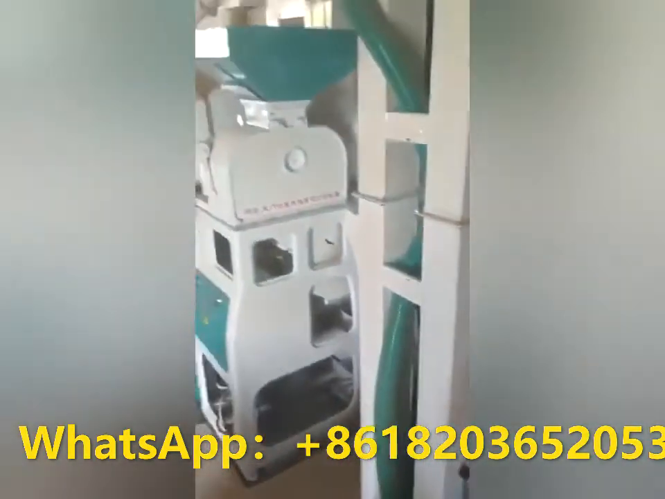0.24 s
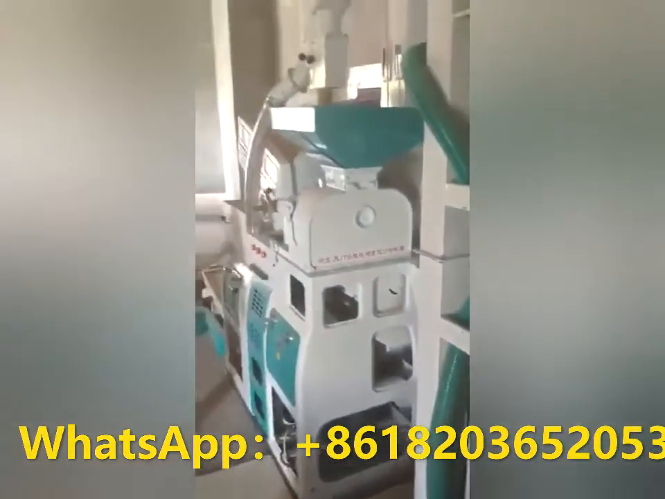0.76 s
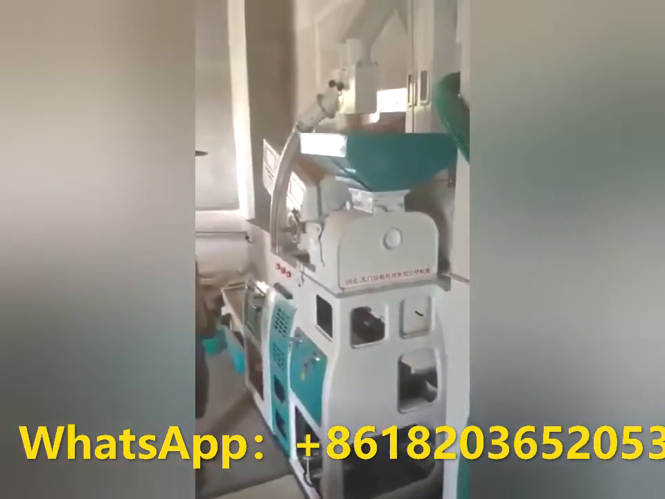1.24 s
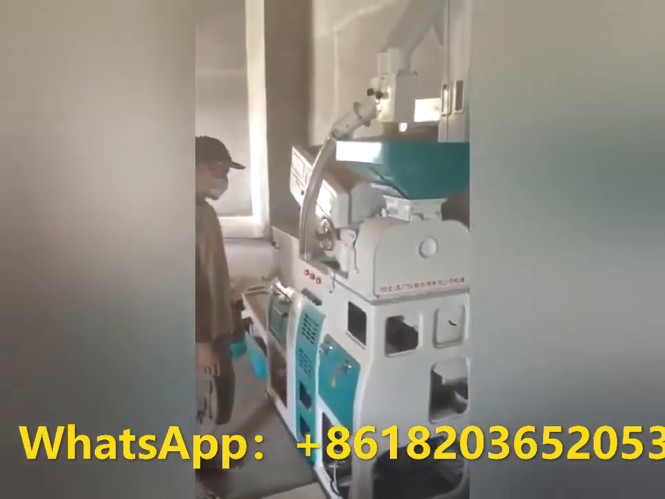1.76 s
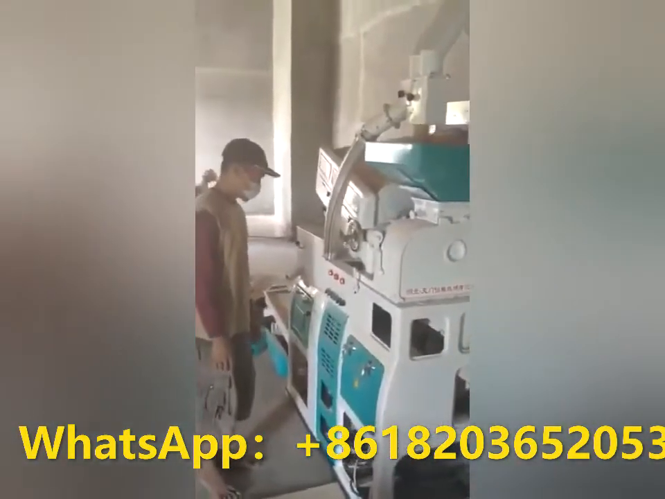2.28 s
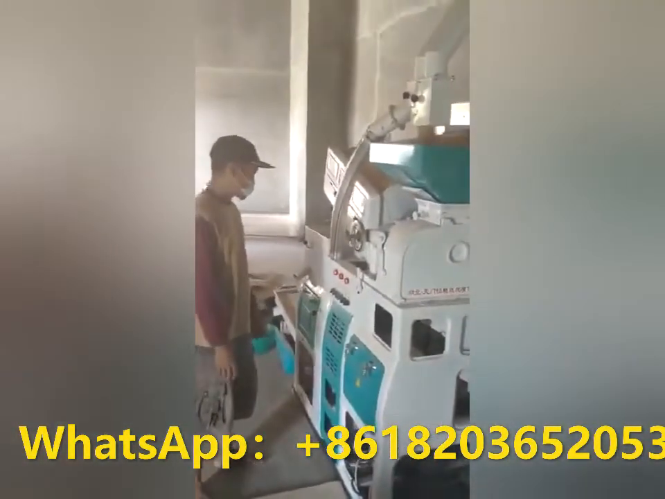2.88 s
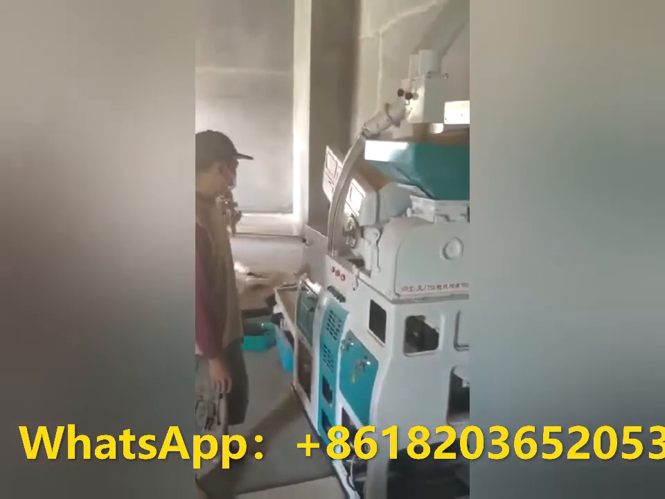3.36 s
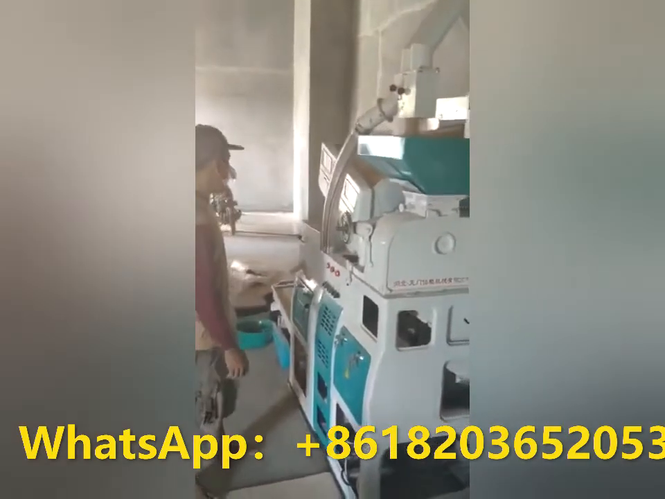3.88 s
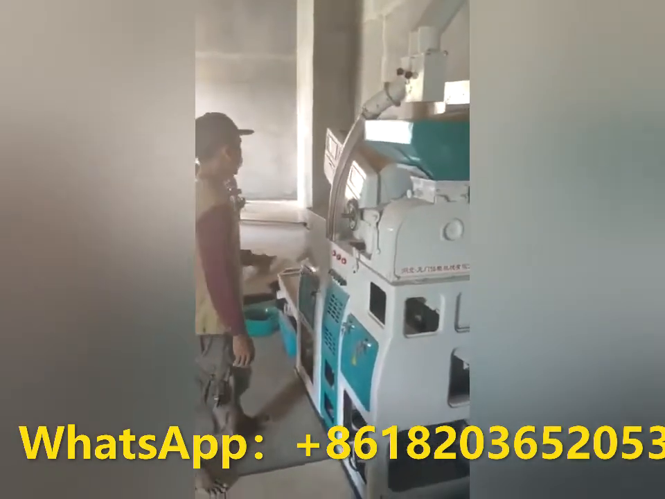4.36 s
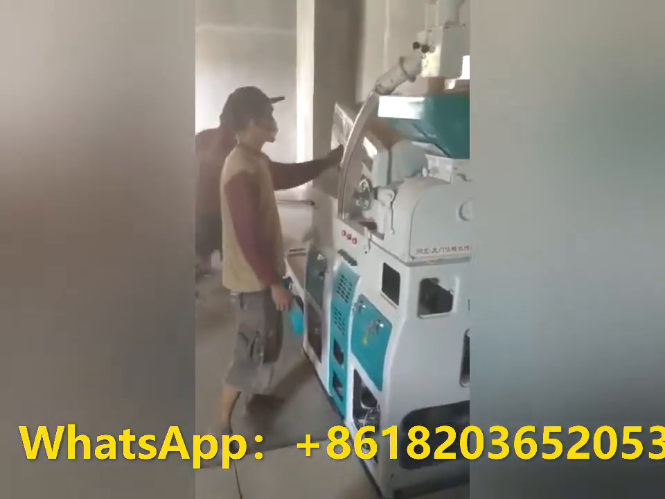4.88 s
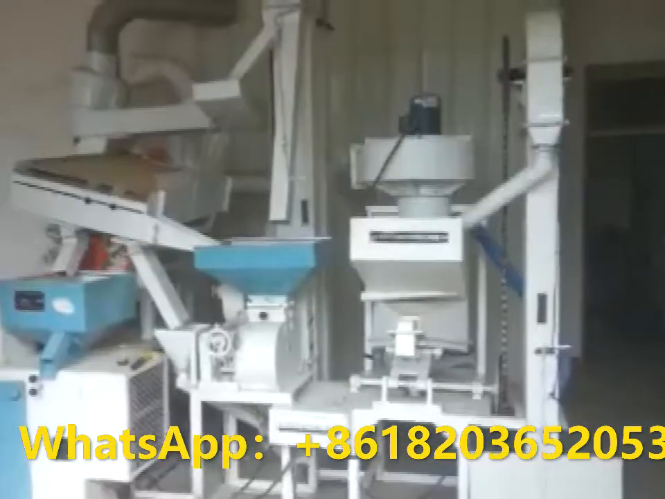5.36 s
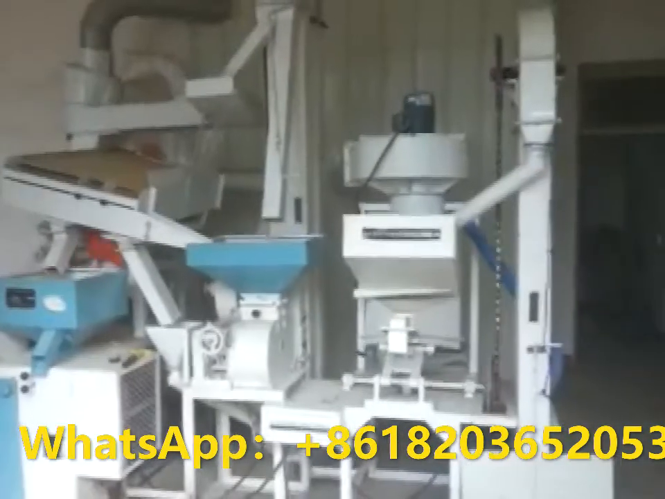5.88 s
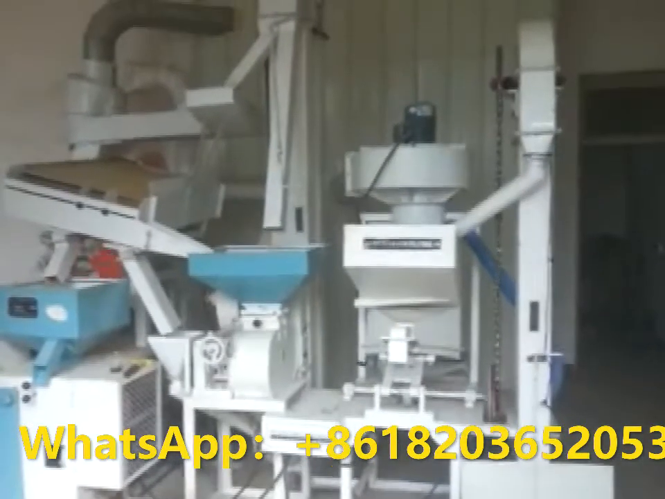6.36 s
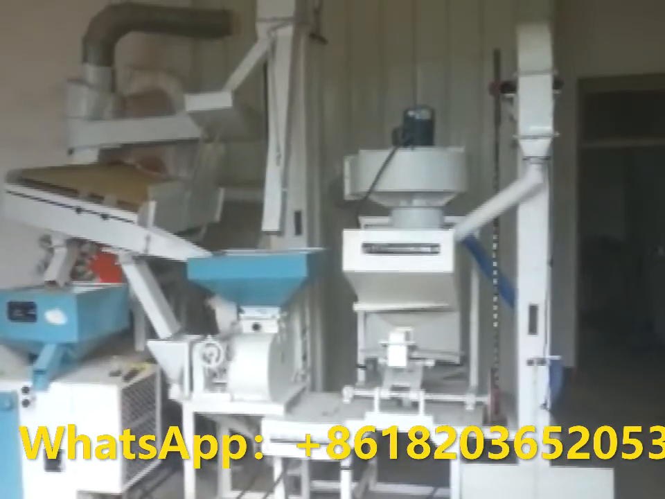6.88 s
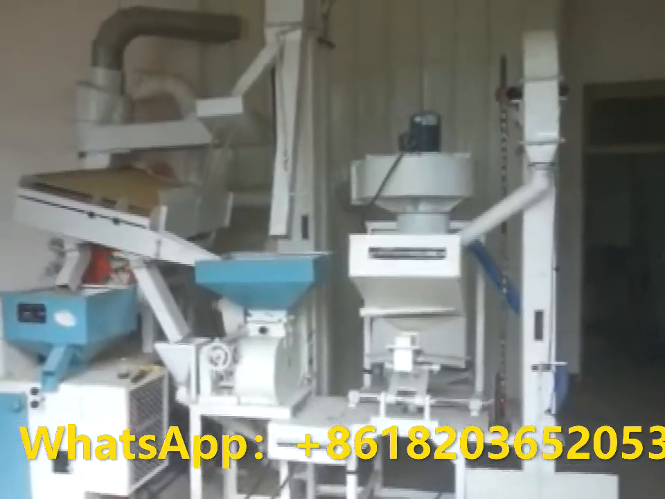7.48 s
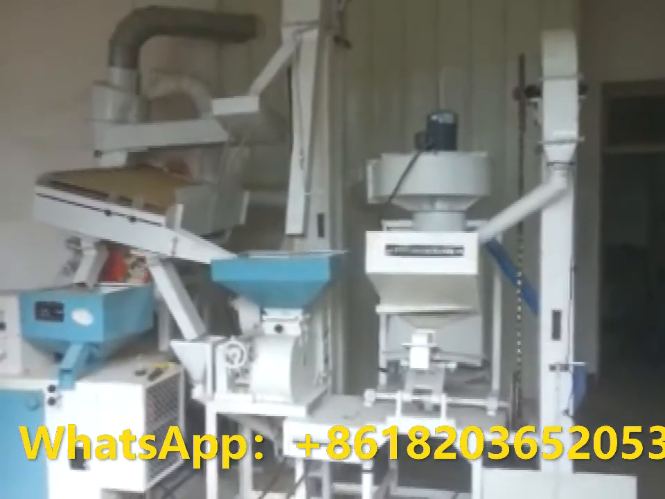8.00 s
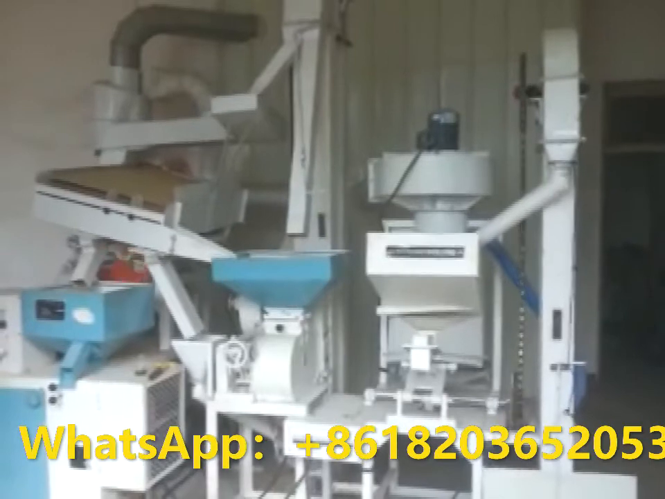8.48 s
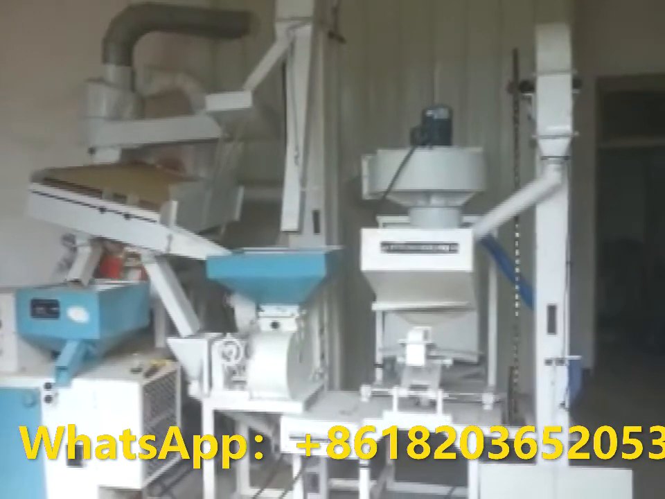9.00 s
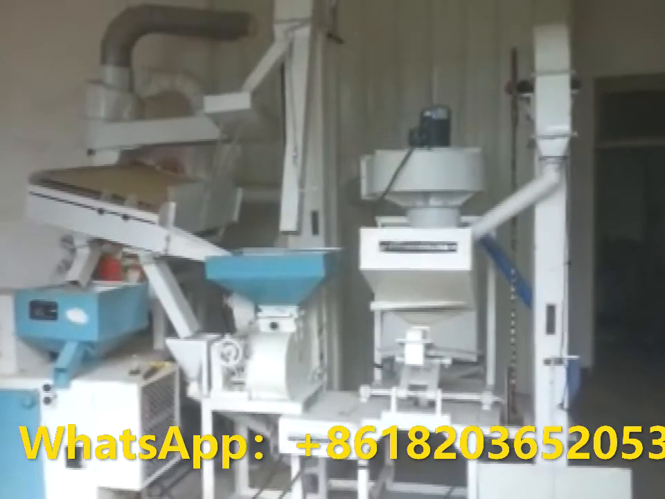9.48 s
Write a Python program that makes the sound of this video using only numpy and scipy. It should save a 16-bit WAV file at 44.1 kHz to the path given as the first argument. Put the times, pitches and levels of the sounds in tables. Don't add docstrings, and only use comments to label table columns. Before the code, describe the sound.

Steady close machine roar with gritty grain hiss and faint belt squeaks, a short silent gap, then duller phone-quality plant noise pulsing and whining.

```python
import sys
import numpy as np
from scipy import signal
from scipy.io import wavfile
from scipy.ndimage import uniform_filter1d

SR = 44100
rng = np.random.default_rng(int(sys.argv[2]) if len(sys.argv) > 2 else 0)


def persist_wave(psi):
    counts = np.round(np.clip(psi, -1, 1) * 32767).astype(np.int16)
    wavfile.write(sys.argv[1], SR, np.atleast_2d(counts).T)


def how_loud(loudness_db):
    steps = np.asarray(loudness_db, float) / 20
    return 10 ** steps


N = 429527
T = np.arange(N) / SR
HZ = np.fft.rfftfreq(1024, 1 / SR)
FRAME_S = np.arange(N // 256 + 5) * 256 / SR
STOP_S, START_S = 5.014, 5.1657


def evened(x):
    return x / np.sqrt(np.mean(x ** 2) + 1e-20)


def read(points, hz):
    f, value = np.transpose(points)
    return np.interp(np.log(hz + 1), np.log(f + 1), value)


def drift(t, top_hz):
    rates = np.geomspace(top_hz / 20, top_hz, num=16)
    return evened(sum(np.sin(2 * np.pi * (f * t + rng.random())) / f ** 0.26 for f in rates))


def swells(feed, follows, lurch_db):
    s, level = np.transpose(feed)
    move = np.interp(FRAME_S, s, level - np.mean(level))
    centres_hz, shares = np.transpose(follows)
    moves = np.array([k * move + lurch_db * drift(FRAME_S, 21.94) for k in shares])
    blend = np.array([read(list(zip(centres_hz, row)), HZ) for row in np.eye(len(follows))])
    return blend.T @ moves


def patches(bins, frames):
    field = rng.standard_normal((len(FRAME_S), len(HZ))).T
    return evened(uniform_filter1d(uniform_filter1d(field, bins, 0), frames, 1))


def spectra(x, size=1024):
    z = signal.stft(np.pad(x, (0, 2 * size)), nperseg=size, noverlap=size * 3 // 4)[2]
    return z[:, :N * 4 // size + 5]


def sound(z, size=1024):
    return signal.istft(z, nperseg=size, noverlap=size * 3 // 4)[1][..., :N]


def grains(per_s, spread_db):
    hardness_db = spread_db * np.minimum(rng.exponential(1, N), 5)
    power = how_loud(2 * hardness_db) * (rng.random(N) < per_s / SR)
    puff = how_loud(-120 * np.arange(1500) / SR / 0.039)
    envelope = np.sqrt(abs(signal.oaconvolve(power, puff)[:N]))
    return evened(envelope * rng.standard_normal(N))


def tone(t, hz, db, waver_db, waver_hz, slip_hz):
    level = how_loud(db + waver_db * drift(FRAME_S, waver_hz))
    turns = np.cumsum(hz + slip_hz * drift(FRAME_S, 1.5)) * FRAME_S[1] + rng.random()
    return np.sqrt(2) * np.interp(t, FRAME_S, level) * np.sin(2 * np.pi * np.interp(t, FRAME_S, turns))


# frequency in Hz, left minus right in dB.
PORT_MISMATCH = [(100, 0.04), (1500, 0.8), (4000, 0.56), (6000, 0.6), (7400, 0), (8400, -5.5), (9900, -19),
                 (12300, -14.5)]
# frequency in Hz, left-right likeness from 0 to 1.
PORT_LIKENESS = [(30, 0.76), (110, 0.92), (200, 1), (350, .75), (690, .6), (1200, .1), (3000, 0.082),
                 (12000, 0.011)]


def ports(left, other, db):
    same = np.clip(read(PORT_LIKENESS, HZ), 0, 1)[:, None]
    right = same * left + np.sqrt(1 - same ** 2) * other
    colour_db = np.array([read(PORT_MISMATCH, HZ), 0 * HZ])[:, :, None]
    return sound(np.array([left, right]) * how_loud(colour_db + db))


# time in seconds, change in dB.
NEAR_FEED = [
    (0, -0.36),
    (.9, 0.6),
    (1.6, 0),
    (2.1, 0.5),
    (2.6, 0),
    (3.3, 0.3),
    (3.7, 0),
    (4.2, 0.1),
    (4.7, -0.2),
    (4.97, -0.5),
]
# frequency in Hz, share of the change.
NEAR_FOLLOWS = [(300, 0.27), (2200, .8), (9500, 1.2)]
# frequency in Hz, density in dB per Hz.
ROAR_SPECTRUM = [(15, -50), (25, -30), (59, -26.5), (96, -14.5), (128, -18.5), (154, -3), (209, -3.5),
                 (247, -7), (278, -5), (370, -9), (431, -4.5), (624, -6.5), (874, -11.5), (983, -14.5),
                 (1400, -21.5), (1820, -51), (3080, -120)]


def near_roar():
    feed_db = swells(NEAR_FEED, NEAR_FOLLOWS, lurch_db=0.5)
    db = read(ROAR_SPECTRUM, HZ)[:, None] + feed_db + 1.2 * patches(4, 10)
    left, other = [spectra(v) for v in rng.standard_normal((2, N))]
    return how_loud(-13.5) * evened(ports(left, other, db))


# frequency in Hz, density in dB per Hz.
GRAIN_SPECTRUM = [(350, -23), (750, -9), (1250, -3), (2100, -7), (3200, -9.5), (4500, -12), (7000, -15.5),
                  (8500, -11.5), (10300, -7.5), (12300, -9)]


def near_grain():
    gusts_db = 0.8 * drift(FRAME_S, 13) * read([(1000, 0.23), (9000, 0.66)], HZ)[:, None]
    feed_db = swells(NEAR_FEED, NEAR_FOLLOWS, lurch_db=0.5)
    db = read(GRAIN_SPECTRUM, HZ)[:, None] + feed_db + 1.67 * patches(9, 9) + gusts_db
    return how_loud(-13.5) * evened(ports(spectra(grains(6000, 1.8)), spectra(grains(6000, 2.2)), db))


# frequency in Hz, level in dB.
MOTOR_HUM = [(98.2, -38), (161.5, -30.5), (205.9, -22.5), (236, -25.5), (254, -31.5)]
# multiple of the blade rate, level in dB, left minus right in dB, right polarity.
BLADE_TONES = [(1, -30, 0, 1), (2, -29, -3, 1), (4, -34.5, -3, 1), (5, -41.5, 5, 1), (8, -38, 3, -1)]
# time in seconds, peak in dB.
BELT_SLIPS = [
    (.23, -37),
    (.53, -40),
    (.84, -40),
    (1.18, -31),
    (1.47, -38),
    (2.71, -31),
    (3.2, -32),
    (3.28, -37),
    (3.47, -35),
    (4.07, -40),
]


def near_tones():
    blade_hz, slip_half_s, rest_db = 213.3, 0.023, -48
    t = T[:N * 6 // 11]
    hum = sum(tone(t, hz, db, 0.3, 12, 0.9) for hz, db in MOTOR_HUM)
    blades = 0
    for multiple, db, pan_db, polarity in BLADE_TONES:
        sides = np.array([[how_loud(pan_db / 2)], [polarity * how_loud(-pan_db / 2)]])
        blades = blades + tone(t, multiple * blade_hz, db, 4.0, 16, 1.3) * sides
    belt = sum(tone(t, hz, db, 2.5, 70, 18) for hz, db in [(5385, -6), (5418, 0), (5450, -4)])
    slips = sum(how_loud(db) * np.exp(-((FRAME_S - s) / slip_half_s) ** 2) for s, db in BELT_SLIPS)
    squeak = belt * np.interp(t, FRAME_S, how_loud(rest_db) + slips)
    both = hum + blades + squeak * how_loud(np.array([[3.0], [-4.0]]))
    return np.pad(both, ((0, 0), (0, N - len(t))))


# frequency in Hz, density in dB per Hz.
HANDLING_SPECTRUM = [(20, 0), (45, -2), (70, -9.5), (110, -49), (20000, -120)]


def handling():
    db = read(HANDLING_SPECTRUM, HZ)[:, None] + 4.7 * drift(FRAME_S, 7.4)
    noise = np.array([spectra(v) for v in rng.standard_normal((2, N))])
    return how_loud(-43.0) * evened(sound(noise * how_loud(db)))


# frequency in Hz, step in dB.
STEP_OVER_LEVEL = [(300, -10), (1200, 0), (3000, 4.5), (7000, 6.5), (8500, 2), (12000, 0)]


def starved(x):
    n, k = np.arange(2048), np.arange(592)
    band_hz = k[::16] * SR / 2048
    window = np.sin(np.pi * (n + 0.5) / 2048)[:, None]
    basis = window * np.cos(np.pi / 1024 * np.outer(n + 512.5, k + 0.5))
    padded = np.pad(x, ((0, 0), (1324, 0)))
    frames = np.lib.stride_tricks.sliding_window_view(padded, 2048, axis=1)[:, ::1024][:, :225]
    lines = (frames.reshape(450, 2048) @ basis).reshape(2, 225, 592)
    mix = np.array([[1, 1], [1, -1]]) / np.sqrt(2)
    summed = np.repeat(rng.random((225, 37)) < read([(7000, 0.85), (8300, 0.001)], band_hz), 16, axis=1)
    lines = np.where(summed, np.tensordot(mix, lines, 1), lines)
    level = np.sqrt((lines.reshape(2, 225, 37, 16) ** 2).mean(3))
    usual = level.mean(1, keepdims=True)
    masked = np.maximum(usual * how_loud(read(STEP_OVER_LEVEL, band_hz)), usual[::-1] * how_loud(-9.0))
    reserve_db = 2.6 * evened(uniform_filter1d(rng.standard_normal(level.shape), 2, axis=1))
    step = np.repeat(masked * how_loud(reserve_db), 16, axis=2)
    lines = np.sign(lines) * np.floor(abs(lines) / step + 0.41) * step
    lines = np.where(summed, np.tensordot(mix, lines, 1), lines)
    halves = (lines.reshape(450, 592) @ basis.T / 512).reshape(2, 225, 2, 1024)
    joined = (halves[:, 1:, 0] + halves[:, :-1, 1]).reshape(2, -1)[:, 300:]
    return np.pad(joined, ((0, 0), (0, N - joined.shape[1])))


# time in seconds, change in dB.
PLANT_FEED = [(5.17, -1.5), (5.5, .5), (5.85, -1), (6.06, 2), (6.35, -1), (6.75, 2.5), (7.0, 0), (7.4, 0),
              (7.6, 2), (7.85, -1), (8.15, .5), (8.5, -0.1), (9.1, 0.1), (9.74, -0.6)]
# frequency in Hz, share of the change.
PLANT_FOLLOWS = [(250, 0.17), (1200, 0.35), (3000, .9)]
# frequency in Hz, density in dB per Hz.
DIN_SPECTRUM = [(18, -71), (30, -48), (52, -19.5), (85, -16.5), (106, -6), (183, -4.5), (308, 1), (425, -2),
                (541, -14), (662, -10), (1160, -10.5), (1280, -11.5), (1450, -10), (1700, -9.5),
                (3650, -18.5), (4740, -51), (8030, -120)]
GEAR_TONES_HZ = [70, 115.7, 138.6, 757.7, 899, 959.6, 1010.7, 1063.2, 1131.8, 1137.2, 1349.9, 1368.7,
                 1394.3, 1425.2, 1446.8, 1480.4, 1495, 1518.1, 1635.2, 1650, 1664.8, 1733.4, 1746.9, 1857.2,
                 2069.9, 2110.3, 2237, 2328.3, 2598.8, 2625.7, 3106.8, 3559.7, 3687.6, 3795.2]
GEAR_LEVELS_DB = [-45, -30.5, -38, -39.5, -35.5, -42, -35.5, -42, -40, -35.5, -41, -42, -32.5, -34.5, -37.5,
                  -35.5, -36, -33.5, -39.5, -39.5, -33.5, -38.5, -31.5, -40.5, -38, -41, -41, -39.5, -38.5,
                  -46, -48, -46.5, -50, -55]


def plant():
    sieve_hz, buckets_hz = 6.4, 15
    stroke = np.cos(2 * np.pi * sieve_hz * FRAME_S + 0.44 * drift(FRAME_S, 2.0))
    bucket = np.cos(2 * np.pi * buckets_hz * FRAME_S + 1.4 * drift(FRAME_S, 2.3))
    sieve_db = np.outer(read([(1200, 0.1), (2500, 0.37)], HZ), stroke)
    bucket_db = np.outer(read([(300, 0.2), (900, 1.7), (2200, 0.2)], HZ), bucket)
    patch_db = 1.2 * patches(7, 8) * read([(300, 0.3), (1000, 0.76)], HZ)[:, None]
    feed_db = swells(PLANT_FEED, PLANT_FOLLOWS, lurch_db=0.45)
    db = read(DIN_SPECTRUM, np.minimum(HZ, 3600))[:, None] + feed_db + patch_db + sieve_db + bucket_db
    din = how_loud(-15.5) * evened(sound(spectra(grains(4000, 2.2)) * how_loud(db) * (HZ[:, None] < 4200)))
    t = T[N // 2:]
    gears = sum(tone(t, hz, db - 0.8, 2.8, 12, 0.454) for hz, db in zip(GEAR_TONES_HZ, GEAR_LEVELS_DB))
    return din + np.pad(gears, (N - len(t), 0))


# start in seconds, length in seconds, edge shift in Hz.
CHANNEL_SPELLS = [
    (5.15, .38, 61),
    (5.62, .12, -34),
    (5.97, 0.16, 105),
    (6.6, .33, 27),
    (7.17, .08, -57),
    (7.7, 0.24, -26),
    (8.0, 0.22, 46),
    (8.35, 0.11, 32),
    (8.52, .14, -30),
    (8.76, 0.2, 40),
]


def phone(x):
    phone_sr, edge_hz, ramp_s = 8000, 3702, 0.043
    z, hz = spectra(x, size=2048), np.fft.rfftfreq(2048, 1 / SR)[:, None]
    t = np.arange(z.shape[1]) * 512 / SR
    spells_hz = sum(shift * np.clip(np.minimum(t - s, s + length - t) / ramp_s + 0.5, 0, 1)
                    for s, length, shift in CHANNEL_SPELLS)
    over = (hz - edge_hz - spells_hz) / 100
    edge_db = np.clip(-13 * (over + 0.95), -18, 0) - np.clip(110 * over, 0, 120)
    narrow = sound(z * how_loud(edge_db), size=2048)
    mirror = spectra(2 * narrow * np.cos(2 * np.pi * phone_sr * T), size=2048)
    leak_db = read([(4000, -19.0), (4300, -19.5), (4450, -31.5), (4650, -61.5), (5000, -92.5), (20000, -120)], hz)
    return narrow + sound(mirror * how_loud(leak_db) * (hz > phone_sr / 2), size=2048)


def scene():
    near = near_roar() + near_grain() + near_tones() + handling()
    return np.where(T < STOP_S + 0.05, near, plant())


def top_cut(x):
    return signal.sosfilt(signal.butter(12, 12470, fs=SR, output="sos"), x)


def record(dry):
    limited = np.tanh(dry / 1.458) * 1.7
    lowpass = signal.firwin(1201, 12400, window=("kaiser", 9), fs=SR)[None]
    wide = signal.oaconvolve(starved(limited), lowpass, "same")
    fade_s = 4.988
    fade = np.interp(T, [fade_s, fade_s + 0.0045, STOP_S - 0.006, STOP_S], [0.97, 0.41, 0.12, 0])
    start = np.clip((T - START_S) / 0.00008, 0, 1) * np.clip((T[-1] - T) / 0.0002, 0, 1)
    far = phone(dry[0] * (T > STOP_S + 0.06)) * start
    click = how_loud(-26) * (np.arange(N) == round(START_S * SR))
    return top_cut(np.clip(wide * fade, -1, 1) + far + click)


dry = scene()
out = record(dry)
persist_wave(out)
```